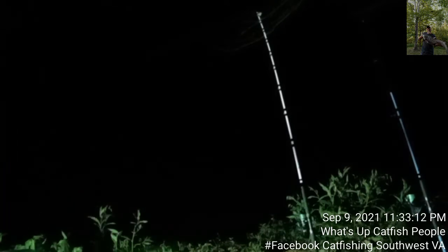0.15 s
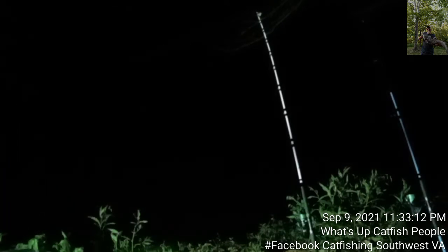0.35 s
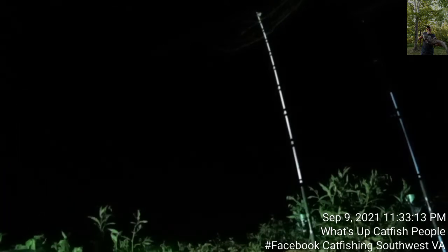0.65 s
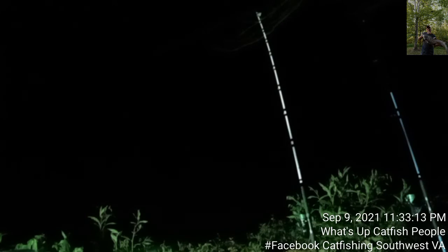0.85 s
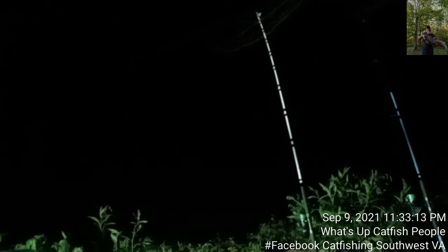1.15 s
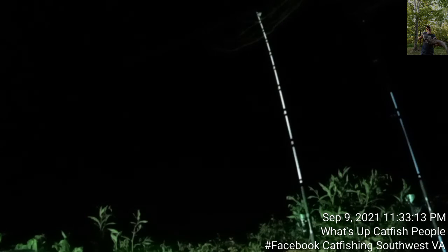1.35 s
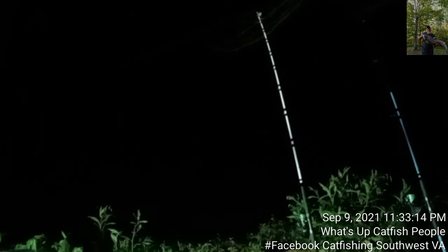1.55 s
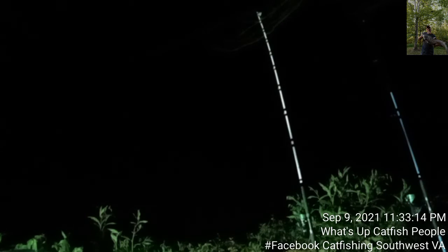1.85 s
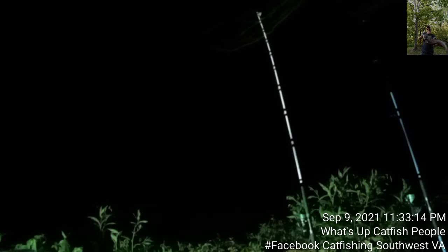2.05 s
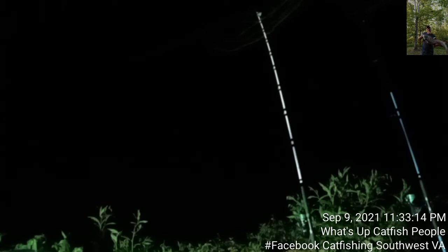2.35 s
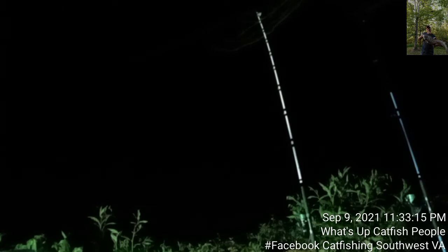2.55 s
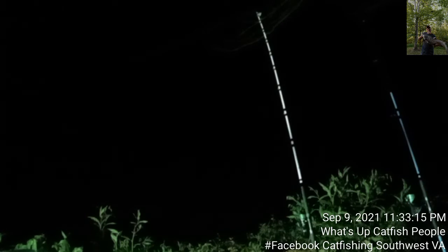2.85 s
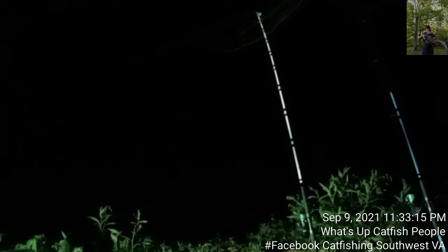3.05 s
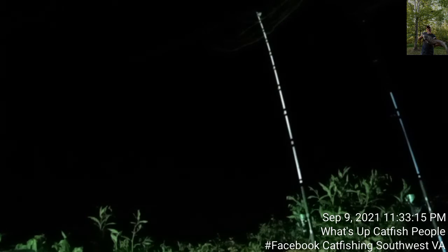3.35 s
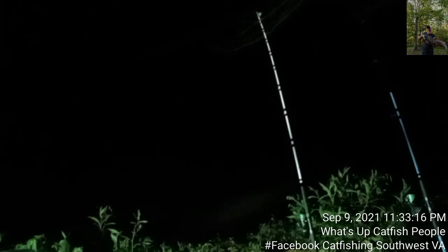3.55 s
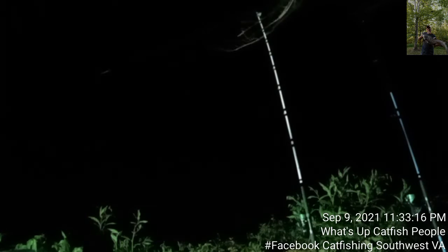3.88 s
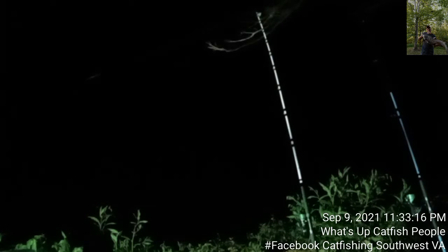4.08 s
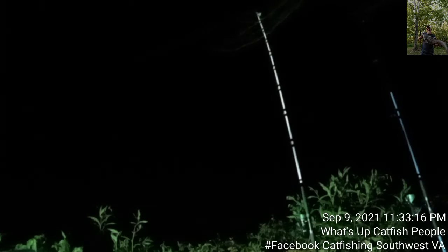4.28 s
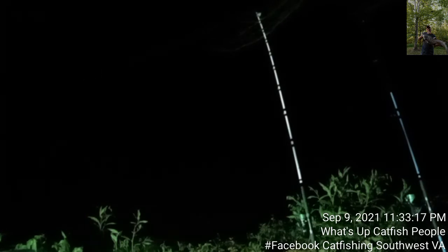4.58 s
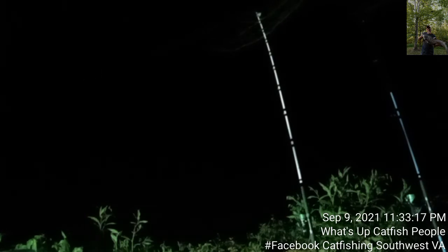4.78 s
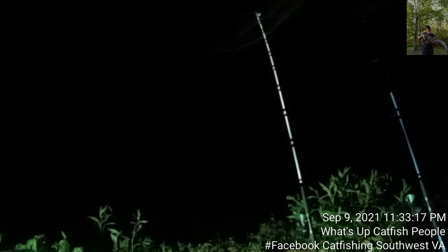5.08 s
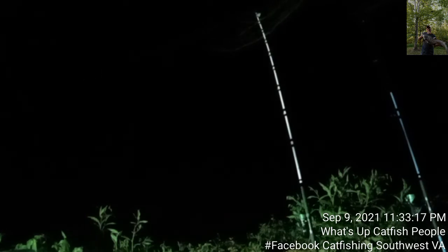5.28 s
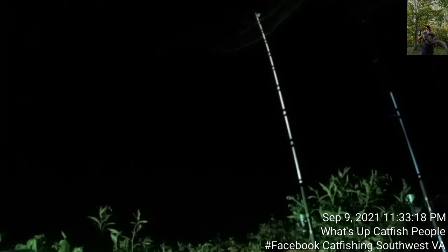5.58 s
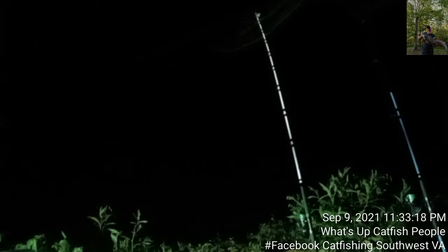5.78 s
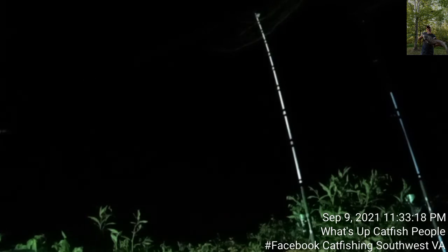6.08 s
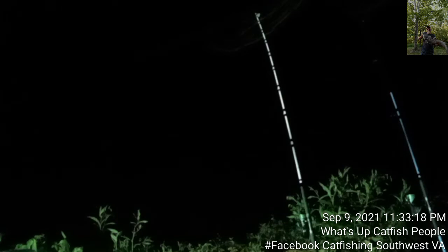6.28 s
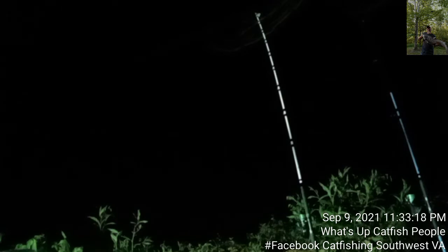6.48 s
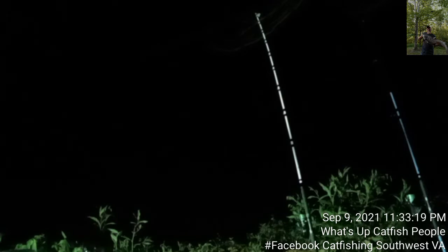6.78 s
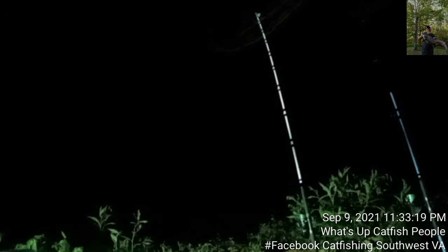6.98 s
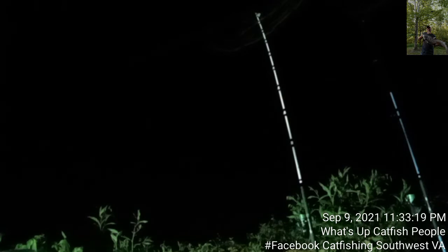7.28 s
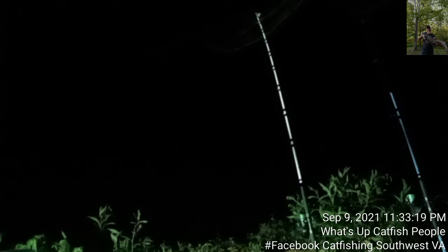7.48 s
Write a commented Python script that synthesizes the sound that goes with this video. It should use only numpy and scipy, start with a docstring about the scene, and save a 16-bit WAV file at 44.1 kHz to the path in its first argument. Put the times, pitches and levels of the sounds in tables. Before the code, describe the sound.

Crickets trill steadily on a riverbank at night, a katydid ticks and buzzes at left, and nearby stems rustle, crackle and snap.

```python
"""Crickets on a riverbank at night: three choirs of short ringing wing strokes, a nearer trill, a thin far singer, chirps.
On the left a katydid of shaped noise ticks, then buzzes; its echo comes blurred off the bushes on the right.
Close to the microphones, random grains rustle as cloth and dry stems, with ringing snaps and dull bumps.
Far off lie a noise rumble, faint wavering engine tones and the hiss of distant insects."""
import sys
import numpy as np
from scipy import signal
from scipy.fft import rfft, irfft, next_fast_len
from scipy.io import wavfile

SR = 44100
rng = np.random.default_rng(int(sys.argv[2]) if len(sys.argv) > 2 else 0)


def pcm_store(signal):
    """Save signal as 16-bit PCM."""
    levels = np.round(np.clip(np.atleast_2d(signal), -1, 1) * 32767)
    wavfile.write(sys.argv[1], SR, levels.astype(np.int16).T)


N = 336483
RIGHT_LAG = 8   # samples by which a near sound reaches the right microphone later


def amp(db):
    """Gain of a level in dB."""
    return 10 ** (np.asarray(db) / 20)


def rms_one(x):
    """Scaled to rms 1 over all channels together."""
    return x / np.sqrt(np.mean(x ** 2) + 1e-20)


def at_hz(points, hz):
    """A spectrum in dB read on a log frequency axis; -80 dB outside its points."""
    f, value = np.transpose(points)
    return np.interp(np.log(hz), np.log(f), value, left=-80, right=-80)


def coloured(x, spectrum):
    """x filtered by a spectrum in dB; rms 1."""
    size = next_fast_len(N)
    hz = np.arange(size // 2 + 1) * SR / size + 1e-3   # keeps the log finite at 0 Hz
    return rms_one(irfft(rfft(x, size) * amp(at_hz(spectrum, hz)), size)[..., :N])


def band(x, hz, width_hz, order=2):
    """Butterworth band-pass."""
    edges = [hz - width_hz / 2, hz + width_hz / 2]
    return signal.sosfilt(signal.butter(order, edges, "band", fs=SR, output="sos"), x)


def low_noise(cutoff_hz):
    """Two channels of low-passed noise, to roughen a tone."""
    low_pass = signal.butter(2, cutoff_hz, fs=SR, output="sos")
    return signal.sosfilt(low_pass, rng.standard_normal((2, N)))


def drift(corner_hz):
    """Slow random wander of rms 1: noise through two equal poles, run at every 40th sample."""
    r = np.exp(-2 * np.pi * corner_hz * 40 / SR)
    noise = rng.standard_normal(N // 40 + 2002)
    slow = signal.lfilter([1], [1, -2 * r, r * r], noise)[2000:]   # the filter has settled by then
    return np.interp(np.arange(N) / 40, np.arange(len(slow)), rms_one(slow))


def held(start, length, rise, fall):
    """Rises in a line to 1 in rise seconds; from start + length on it decays with time constant fall."""
    t = np.arange(N) / SR - start
    return np.clip(t / rise, 0, 1) * np.exp(-np.maximum(t - length, 0) / fall)


def burst(hz, cycles, rise=0):
    """A ring that swells within a cycle and decays over some cycles, its pitch sliding; peak 1."""
    turn = np.arange(int(4 * cycles * SR / hz)) * hz / SR
    tone = np.sin(2 * np.pi * turn * (1 + rise * turn / cycles / 2))
    x = tone * (1 - np.exp(-2 * turn)) * np.exp(-turn / cycles)
    return x / np.abs(x).max()


def add(out, s, left, right):
    """Mixes a near sound in at s seconds, a little later at the right microphone."""
    i = round(s * SR)
    out[0, i:i + len(left)] += left
    out[1, i + RIGHT_LAG:i + RIGHT_LAG + len(right)] += right


# Far rumble. Each row: frequency in Hz, density in dB per Hz.
RUMBLE_SPECTRUM = [(13, -48), (22, -49), (50, -10.5), (91, 0.5), (199, -5.5), (312, -10), (450, -26.5),
                   (900, -30.5), (1800, -35.5), (2400, -15), (2650, -62), (2900, -48), (3300, -49)]
# Likeness of the two sides. Each row: frequency in Hz, correlation.
RUMBLE_LIKENESS = [(25, 0.76), (60, 1), (300, 0.42), (640, 0.041), (3000, 0.17)]


def rumble():
    """Far low noise, its sides built from a shared and an opposed part; the level wanders slightly."""
    mid, side = rng.standard_normal((2, N))
    size = next_fast_len(N)
    hz = np.arange(size // 2 + 1) * SR / size
    alike = np.interp(hz, *np.transpose(RUMBLE_LIKENESS)).clip(0, 1)
    shared = np.sqrt(1 + alike) * rfft(mid, size)
    opposed = np.sqrt(1 - alike) * rfft(side, size) * [[1], [-1]]
    noise = irfft(shared + opposed, size)[:, :N]
    return amp(-54 + 1.45 * drift(15.0)) * coloured(noise, RUMBLE_SPECTRUM)


def hum(hz, waver_hz):
    """A far engine tone that wavers in pitch and flutters in level; rms 1."""
    flutter = amp(1.4 * drift(3.6) + 3.0 * drift(13.0))
    return rms_one(flutter * np.sin(2 * np.pi * np.cumsum(hz + waver_hz * drift(6.08)) / SR))


# Steady far tones. Each row: pitch in Hz, waver in Hz, level in dB before the gain in background().
STEADY_HUMS = [(123.2, 5.02, -61.5), (155.4, 3.8, -68), (201.7, 1.6, -58), (476, 2.45, -86.5)]
# One swell of the 310 Hz tone and one of the 603 Hz tone, added to a resting level.
# Each row: start in seconds, length in seconds, rise in seconds, fall in seconds, level in dB before later gains.
MIDDLE_HUM_SWELL = (4.5, 1.5, 1, 1, -58)
HIGH_HUM_SWELL = (1.2, .8, 0.3, 0.9, -74)


def hums():
    """Steady far engine tones, and two higher ones that each swell once over a resting level."""
    out = sum(amp(level_db) * hum(hz, waver_hz) for hz, waver_hz, level_db in STEADY_HUMS)
    *shape, swell_db = HIGH_HUM_SWELL
    high_level = amp(-90) + amp(swell_db) * held(*shape)
    out += high_level * hum(603, 6.0) * amp(3.0 * drift(8.0) - 2.5)
    *shape, swell_db = MIDDLE_HUM_SWELL
    middle_level = amp(-67) + amp(swell_db) * held(*shape)
    return out + middle_level * hum(310, 4.17)


# Distant insects. Each row: frequency in Hz, density in dB per Hz.
HISS_SPECTRUM = [(5300, -23), (5750, -6), (6500, -0.5), (7300, -1), (8200, -1), (9500, -8.5), (11000, -9.5),
                 (11500, -13), (11900, -17), (13000, -12), (14500, -13), (15700, -27)]


def night_hiss():
    """The blended hiss of distant insects: shaped noise, its level wandering slightly."""
    return coloured(rng.standard_normal((2, N)), HISS_SPECTRUM) * amp(-54.5 + 0.93 * drift(11.0))


def background():
    """Rumble and hums, a little louder at the left microphone than at the right, under the hiss."""
    return (rumble() + hums()) * amp([[2.2], [-2.2]]) + night_hiss()


# Dull bumps close by. Each row: start in seconds, level in dB before later gains, pitch in Hz,
# decay in cycles, pitch rise as a share per decay time.
BUMP_EVENTS = [(0.824, -34, 1445, 4.7, -0.025), (0.843, -38, 1500, 3.0, 0), (0.885, -49, 810, 3.2, -0.063),
               (.978, -35, 1550, 3.2, 0.12), (1.0, -33, 1500, 3.0, 0.18), (1.012, -29.5, 258, 1.6, -0.0031),
               (1.036, -29, 1580, 2.5, 0.23), (1.06, -36, 584, 2.9, 0.015), (1.077, -37, 417, 1.8, -0.093),
               (1.091, -40, 600, 2.9, -0.034), (1.093, -36, 1510, 2.5, 0.017),
               (1.178, -27, 2220, 7, -0.011), (1.485, -51, 1000, 5.9, 0), (3.76, -56, 800, 2.5, -0.024),
               (4.384, -44.5, 230, 4, 0.11), (4.558, -35, 574, 2.7, -0.019), (4.574, -33.5, 518, 3.7, 0.31),
               (4.737, -39, 660, 4.6, 0.04), (4.85, -37, 365, 2.6, -0.099), (4.887, -33, 690, 3.5, 0.038),
               (4.912, -35, 316.7, 2.7, 0.02), (4.961, -36, 360, 3.9, 0.022), (4.987, -35, 296, 4.1, -0.11),
               (5.036, -37, 315, 2.3, -0.03), (5.115, -36, 610, 2.0, 0.15), (5.168, -37, 544, 3.3, -0.0039),
               (5.195, -23.5, 842, 2, -0.11), (5.249, -27.5, 345, 3.2, -0.012),
               (5.31, -35, 298, 2.8, -0.031), (5.477, -32, 322, 3.2, 0.0089), (5.51, -38, 250, 3, -0.11),
               (5.559, -22, 360, 1.8, -0.0021), (5.56, -31.5, 806, 10.6, -0.057),
               (5.568, -26.5, 155, 2.0, -0.061), (5.649, -35, 720, 2.2, 0.038),
               (5.844, -41, 304, 2.1, 0.13), (5.99, -45, 407, 3.6, -0.068), (6.094, -43, 1148, 3.8, 0.059),
               (6.255, -42, 594.6, 3.4, 0.057), (6.294, -35, 636, 6.4, 0.025),
               (6.381, -38, 890, 3.0, 0.038), (6.465, -36, 806, 3.9, -0.074),
               (6.502, -30.5, 251, 1.5, 0.055), (6.555, -33, 390, 3.53, 0.36),
               (6.632, -39, 600, 3.6, 0.089), (6.645, -35, 425, 2.5, -0.014),
               (6.657, -30.5, 540, 3.4, 0.085), (6.72, -36.5, 390, 4.8, -0.0088),
               (6.756, -36, 252, 1.6, 0.018), (6.787, -30.5, 413, 3.6, 0.068),
               (6.823, -37, 382, 2.5, -0.0093), (6.853, -29.5, 370, 2.4, 0.19),
               (6.986, -33, 236, 2.8, 0.37), (7.002, -33.5, 485, 3.4, 0.13), (7.05, -34.5, 200, 6.6, 0.11),
               (7.095, -34, 304, 3.2, -0.045), (7.11, -29.5, 560, 3, -0.054), (7.135, -29, 235, 2.3, 0.069),
               (7.136, -28, 470, 2.5, -0.023), (7.157, -30.5, 230, 2.8, -0.027),
               (7.207, -34.5, 394, 3.2, -0.084), (7.254, -33, 287, 5, 0.294),
               (7.292, -31.5, 437, 3.6, -0.00061), (7.348, -44, 810, 4.1, -0.093),
               (7.481, -35, 947, 7.6, 0.015)]


def bumps():
    """A low lump of three rings: the main one, then weaker ones at random pitches, one near it and one higher."""
    out = np.zeros((2, N + SR))
    chance = rng.random((len(BUMP_EVENTS), 4))
    for (s, level_db, hz, cycles, rise), (late, later, low, high) in zip(BUMP_EVENTS, chance):
        # wait in seconds, pitch ratio, dB taken off
        rings = ((0, 1, 3.0),
                 (0.00836 * late, 0.719 + 0.5 * low, 10.0),
                 (0.014 * later, 1.374 + 1.0 * high, 11.0))
        for wait, ratio, less_db in rings:
            x = amp(level_db - less_db) * burst(hz * ratio, max(cycles, .7), rise)
            add(out, s + wait, x * amp(1.0), x * amp(-1.0))
    return out[:, :N]


# Small snaps close by. Each row: start in seconds, main ring level in dB before panning, pitch in Hz,
# left over right in dB, body level in dB (its peak is set 6 dB higher, before panning).
SNAP_EVENTS = [(0.2239, -40, 9100, -1.5, -70), (0.292, -28.5, 7540, -6, -76),
               (0.4994, -47, 7680, -1.0, -67), (0.7406, -37, 9270, 12, -68), (0.823, -26.5, 6640, 6, -36.5),
               (0.9863, -30, 9100, -17, -49), (0.9974, -36, 8000, 0, -33.5), (1.1346, -38, 7000, -2, -53),
               (1.178, -31, 8400, -6, -57), (1.2375, -34, 8360, -12, -47), (1.36, -37, 7110, -11, -51),
               (1.3975, -28, 7900, -18, -57), (1.493, -34, 9100, -0.5, -49), (1.932, -34, 8200, -15, -74),
               (1.942, -34, 7870, 4, -74), (1.956, -34.5, 7700, -27, -78), (1.9627, -30, 7700, 14, -76),
               (2.946, -23.5, 7550, -8, -73), (3.053, -28, 7400, 3, -75), (4.199, -35, 9000, 2, -70),
               (4.472, -39, 9600, -4, -66), (4.5496, -44, 7940, -17, -50), (4.64, -32, 6600, 1, -58),
               (4.7544, -28, 7600, -10, -48), (4.7563, -21, 7900, -17, -15), (4.779, -35, 8200, -26, -31),
               (4.852, -32, 7800, -16, -42), (4.8986, -28, 6750, 3, -48), (4.9415, -23, 6500, -1, -46),
               (4.9445, -26, 6890, 4, -44), (4.9477, -21, 7240, -1, -46), (5.045, -30, 7800, 0, -55),
               (5.0834, -26, 7800, -5, -55), (5.217, -29, 5020, 8, -50), (5.482, -33, 5100, 0, -53),
               (5.5326, -26, 8100, -2.5, -59), (5.627, -33, 9500, 2, -58), (5.691, -31, 8240, 12, -43),
               (5.9359, -29, 9600, 3, -58), (5.9743, -29.5, 7320, -7, -60), (6.0422, -34, 7920, 13, -59),
               (6.4221, -38, 5040, 5, -58), (6.4368, -30.5, 6200, 4, -58), (6.4606, -29, 7560, -5, -49),
               (6.5483, -34, 6130, 2, -60), (6.7598, -20.5, 7800, -5, -36), (6.884, -33, 5056, 6, -55),
               (7.04, -29, 7000, 2, -55), (7.078, -26, 7500, 0, -50), (7.098, -21, 7700, 0, -52),
               (7.113, -26, 7500, 0, -55), (7.3516, -28, 7060, 3, -50)]
SPRAY_DB, SPRAY_S = -9.5, 0.011   # splinter noise: gain relative to the main ring, decay time


def snaps():
    """A bright ring with two side rings, a short low body, and a spray of splinters as decaying noise."""
    out = np.zeros((2, N + SR))
    t = np.arange(SR // 10) / SR
    noise = rng.standard_normal((len(SNAP_EVENTS), 2, len(t)))
    sprays = band(noise, 7700, 4300.0) * np.exp(-t / SPRAY_S)
    for (s, level_db, hz, pan_db, body_db), spray in zip(SNAP_EVENTS, sprays):
        add(out, s + .001, *(amp(level_db + SPRAY_DB) * spray))
        # dB against the main ring, pitch ratio, decay in cycles
        for side_db, ratio, cycles in ((0, 1, 4.9), (-12.0, 0.615, 3.7), (-11.5, 1.12, 6.2)):
            x = amp(level_db + side_db) * burst(hz * ratio, cycles)
            add(out, s + .0008, x * amp(pan_db / 2), x * amp(-pan_db / 2))
        # the body and its upper ring: dB against the body level, Hz, decay in cycles
        for over_db, body_hz, cycles in ((6, 1850, .9), (-1.5, 2700, 1.0)):
            x = amp(body_db + over_db) * burst(body_hz, cycles)
            add(out, s + .0013, x * amp(1.5), x * amp(-1.5))
    return out[:, :N]


def grains(per_s, spread_db, clump_db):
    """Three streams of random clicks of uneven size, coming in clumps."""
    sizes = amp(spread_db * np.minimum(rng.exponential(1, (3, N)), 5)) * rng.choice([-1, 1], (3, N))
    return sizes * (rng.random((3, N)) < per_s * amp(clump_db * drift(25.0)) / SR)


def from_side(x, alike):
    """A near source, later at the right; x[1] and x[2] are what each microphone alone picks up."""
    shared = np.array([x[0], np.roll(x[0], RIGHT_LAG)])
    return np.sqrt(alike) * shared + np.sqrt(1 - alike) * x[1:]


def crunch(spectrum, per_s, cycles, patchy_db, alike, clump_db):
    """Folds or fibres give way one by one, each ringing a few cycles; every pitch comes and goes in patches."""
    clicks, dealt = grains(per_s, 1.6, clump_db), rng.integers(0, 12, N)
    rings = 0
    for k, hz in enumerate(np.geomspace(spectrum[0][0], spectrum[-1][0], 12)):
        struck = clicks * (dealt == k) * amp(patchy_db * drift(7.2))
        rings = rings + band(struck + 1e-18, hz, hz / cycles, order=1)
    return coloured(from_side(rings, alike), spectrum)


# Cloth shoved, cloth scraped, dry stems crackling. Each row: frequency in Hz, density in dB per Hz.
SHOVE_SPECTRUM = [(90, 1.5), (160, -8), (250, -6), (400, 0), (700, -3), (1000, -9.5), (1500, -25)]
SCRAPE_SPECTRUM = [(400, -37), (650, -5.5), (900, -4), (1400, -4), (2000, -6), (2400, -3), (2900, -7)]
CRACKLE_SPECTRUM = [(2300, -18), (2700, -7), (3000, -1.5), (3300, -3), (3800, -5.5), (5600, -5),
                    (7000, -0.5), (8090, 4), (9200, -2), (11000, -8), (12500, -12), (14500, -14.5),
                    (15700, -75)]
# Movements close by. Each row: start in seconds, length in seconds, then shove, scrape and crackle
# levels in dB before later gains.
MOVEMENTS = [(0.81, 0.014, -62, -51, -43), (0.967, 0.033, -68, -51, -41.5),
             (0.988, 0.071, -50.5, -45.5, -54), (1.13, 0.081, -63, -55, -50),
             (1.215, 0.21, -79, -62, -49.5), (1.437, 0.066, -72, -62.5, -64), (3.713, 0.13, -85, -67, -66),
             (4.183, 0.14, -81, -71, -59), (4.313, 0.26, -84, -67.5, -55.5), (4.54, 0.1, -50, -46, -44),
             (4.7, 0.066, -61, -48, -50), (4.73, 0.28, -49, -45, -38), (5.025, 0.043, -42, -45.5, -40),
             (5.087, 0.12, -47.5, -45, -36.5), (5.213, 0.056, -48.5, -45, -34),
             (5.317, 0.088, -51.5, -48, -38.5), (5.458, 0.2, -49, -48, -42),
             (5.638, 0.13, -50.5, -56.5, -55.5), (5.794, 0.3, -59.5, -55.5, -45.5),
             (6.182, 0.074, -59, -58, -45), (6.267, 0.04, -58, -50, -53.5), (6.358, 0.11, -60, -55, -51.5),
             (6.44, 0.17, -50.5, -57, -46.5), (6.602, 0.28, -46, -46.5, -41.5),
             (6.96, 0.15, -43.5, -49.5, -39), (7.073, 0.08, -42, -46.5, -44.5),
             (7.21, 0.15, -49.5, -51.5, -46), (7.382, 0.034, -60, -49, -44), (7.444, 0.065, -59, -54, -53)]
# Envelopes of shove, scrape and crackle, in that order. Each row: delay in seconds, shortest rise in seconds,
# added rise as a share of the length, fall in seconds, unevenness in dB.
MOVEMENT_SHAPES = [(0.0061, 0.018, 0.051, 0.05, 0), (0.0008, 0.0059, 0.023, 0.074, 1),
                   (0.0015, 0.0046, 0.076, 0.14, 0.8)]


def rustle():
    """Each movement shoves and scrapes cloth below and crackles dry stems above; the lows come in later."""
    levels = []
    for k, (delay, rise, share, fall, uneven_db) in enumerate(MOVEMENT_SHAPES):
        power = sum((amp(db[k]) * held(s + delay, length, rise + share * length, fall)) ** 2
                    for s, length, *db in MOVEMENTS)
        levels.append(np.sqrt(power) * amp(uneven_db * drift(12.0)))
    shove = crunch(SHOVE_SPECTRUM, 600.0, 4.8, patchy_db=2.5, alike=0.81, clump_db=2.5) * levels[0]
    scrape = crunch(SCRAPE_SPECTRUM, 1000.0, 5.9, patchy_db=3.0, alike=0.57, clump_db=3.0) * levels[1]
    fibres = crunch(CRACKLE_SPECTRUM, 20000.0, 6.0, patchy_db=2.2, alike=.33, clump_db=2.0)
    ticks = coloured(from_side(grains(1500.0, 4.0, 3.0), .4), CRACKLE_SPECTRUM)
    crackle = (.85 * fibres + .5 * ticks) * levels[2]
    return (shove + scrape) * amp([[.8], [-.8]]) + crackle * amp([[-.9], [.9]])


# The katydid straight from the left, and its echo off the bushes on the right.
# Each row: frequency in Hz, density in dB per Hz.
KATYDID_SPECTRUM = [(5400, -23), (6400, -6.5), (8000, -20), (9500, -1.5), (10900, 0), (11450, 3.5),
                    (11900, 0), (12300, -1), (12900, -1), (13400, 1.5), (14800, -6), (15700, -8)]
ECHO_SPECTRUM = [(8000, -30), (9500, 0), (11000, -14), (12200, -3), (13500, 1), (14800, -1), (15700, -9)]
# Lone strokes. Each row: time in seconds, level in dB against a buzz stroke.
LONE_STROKES = [(.019, -7), (.082, -6), (.144, -7), (.537, 4), (.778, 2), (.941, 1), (1.103, 3), (1.178, 4),
                (1.243, -4), (1.303, -10), (1.357, -1), (3.946, -2)]
BUZZ_START_S, BUZZ_END_S = 1.42, 3.9
BUZZ_PER_S, BUZZ_FASTEST_S, BUZZ_SAG = 18.67, 2.3, .5   # top stroke rate, its moment, loss per s squared
STROKE_RISE_S, STROKE_FALL_S = 0.013, 0.014
KATYDID_DB, ECHO_DB = -50.5, -60.5   # noise level where the envelope is 1
ECHO_LAG_S, ECHO_SMEAR_S = 0.012, 0.018
WHIRR, WHIRR_END_S, WHIRR_FADE_S = 0.23, 3.97, .15   # envelope height, then its fade


def katydid():
    """Each wing stroke is a rasp that swells and dies about alike, over a whirr; the right has it late and blurred."""
    now = np.arange(N) / SR
    buzzing = (now >= BUZZ_START_S) & (now < BUZZ_END_S)
    rate = (BUZZ_PER_S - BUZZ_SAG * (now - BUZZ_FASTEST_S) ** 2) * buzzing
    strokes = np.diff(np.ceil(np.cumsum(rate) / SR), prepend=0)   # 1 where a stroke falls
    strokes *= amp(.6 * rng.standard_normal(N))
    s, db = np.transpose(LONE_STROKES)
    strokes[(s * SR).astype(int)] = amp(db)
    t = np.arange(-3000, 3001) / SR
    direct_shape = np.exp(np.where(t < 0, t / STROKE_RISE_S, -t / STROKE_FALL_S))
    echo_shape = np.exp(-.5 * ((t - ECHO_LAG_S) / ECHO_SMEAR_S) ** 2)
    whirr = WHIRR * np.exp(-np.maximum(now - WHIRR_END_S, 0) / WHIRR_FADE_S)
    direct = signal.fftconvolve(strokes, direct_shape, "same") + whirr
    echo = signal.fftconvolve(strokes, echo_shape, "same") + whirr
    noise = rng.standard_normal((2, N))
    left = amp(KATYDID_DB) * direct * coloured(noise[0], KATYDID_SPECTRUM)
    right = amp(ECHO_DB) * echo * coloured(noise[1], ECHO_SPECTRUM)
    return np.array([left, right])


# Brief chirps. Each row: middle in seconds, pitch in Hz, width in Hz, length in seconds,
# level in dB before the gain in crickets().
CHIRP_EVENTS = [(2.403, 8500, 890, 0.064, -46.5), (2.51, 8440, 900, 0.1, -49),
                (3.738, 9740, 60, 0.022, -48.5)]


def chirps():
    """Each chirp is a narrow band of noise under a bell-shaped envelope."""
    out, t = np.zeros((2, N)), np.arange(N) / SR
    for s, hz, width_hz, length, level_db in CHIRP_EVENTS:
        near = slice(round((s - .2) * SR), round((s + .2) * SR))
        rasp = rms_one(band(rng.standard_normal((2, len(t[near]))), hz, width_hz))
        bell = np.exp(-.5 * ((t[near] - s) / (length / 3)) ** 2)
        out[:, near] += amp(level_db) * rasp * bell
    return out


# Phrases of a thin far singer. Each row: start in seconds, length in seconds,
# level in dB before the gain in crickets().
THIN_PHRASES = [(.24, 0.38, -61.5), (3.3, 0.49, -65)]
THIN_HZ, THIN_PER_S, THIN_EDGE_S = 7700, 36, 0.1   # pitch, wing strokes per second, rise and fall
THIN_DB = -79   # between phrases, before the gain in crickets()


def thin_singer():
    """A high tone roughened by slow noise and pulsed by the wing strokes."""
    t = np.arange(N) / SR
    phrases = sum(amp(db) * held(s, length, THIN_EDGE_S, THIN_EDGE_S) for s, length, db in THIN_PHRASES)
    pulse = 1 + .7 * np.sin(2 * np.pi * THIN_PER_S * t)
    tone = low_noise(110.0) * np.sin(2 * np.pi * THIN_HZ * t)
    return (amp(THIN_DB) + phrases) * rms_one(tone * pulse)


# A nearer cricket's swells. Each row: start in seconds, length in seconds, pitch in Hz,
# level in dB added to the resting level.
LEAD_SWELLS = [(-.1, .4, 4150, -62), (1.05, .4, 3925, -68), (1.95, 0.53, 3900, -57),
               (2.98, .62, 4006, -56.5), (3.7, .3, 3870, -72), (4.7, 0.26, 3965, -52),
               (5.85, 0.55, 4020, -58), (6.4, 0.475, 3850, -66), (7.3, .4, 4060, -58)]
LEAD_HZ, LEAD_DB, LEAD_EDGE_S = 3850, -85, 0.074   # pitch and level between swells, rise and fall


def lead_cricket():
    """About 38 wing strokes a second, each a short tone with a rough edge; pitch shifts with each swell."""
    hz, level = LEAD_HZ, amp(LEAD_DB)
    for s, length, swell_hz, db in LEAD_SWELLS:
        swell = held(s, length, LEAD_EDGE_S, LEAD_EDGE_S)
        hz = hz + (swell_hz - LEAD_HZ) * swell
        level = level + amp(db) * swell
    stroke = np.cumsum(38 + 1.5 * drift(2.0)) / SR
    gate = np.maximum(np.sin(2 * np.pi * stroke) + .9, 0)
    tone = np.sin(2 * np.pi * np.cumsum(hz) / SR)
    return level * rms_one(gate * low_noise(45.0) * tone)


def choir(spectrum, width_hz, per_s, jitter, count):
    """Singers spread in pitch, six to a pitch and side; each wing stroke is a short ring at the song pitch."""
    out, strokes = np.zeros((2, N)), np.arange(450)
    for hz in np.linspace(spectrum[0][0], spectrum[-1][0], count):
        draw = rng.standard_normal((3, 2, 6, 450))
        tempo = per_s * (1 + .04 * draw[0, :, :, :1])   # each singer keeps its own
        moment = (strokes + jitter * draw[1] + draw[0, :, :, 1:2]) / tempo
        at = ((moment * SR) % N).astype(int)
        live = strokes < tempo * N / SR
        clicks = np.full((2, N), 1e-18)
        for side in range(2):
            np.add.at(clicks[side], at[side], np.sign(draw[2, side]) * live[side])
        out += band(clicks, hz, width_hz) * amp(2.2 * drift(3.0))   # each pitch swells and thins
    return coloured(out, spectrum)


# The three choirs by song pitch. Each row: frequency in Hz, filter gain in dB.
LOW_SPECTRUM = [(1860, -34), (1920, -26), (2000, -9), (2090, -1), (2150, 0), (2340, -4), (2450, -16),
                (2510, -36), (2560, -60)]
MID_SPECTRUM = [(2800, -50), (2900, -30), (3000, -17), (3300, -12), (3580, -8), (3720, -2), (3850, 0),
                (3960, -3.5), (4060, -10), (4150, -15), (4300, -20), (4400, -40)]
HIGH_SPECTRUM = [(4050, -30), (4200, -11), (4500, -9), (4800, -3), (5150, 0), (5400, -4), (5600, -8),
                 (5750, -16), (5900, -40)]
# Slow swell of the middle choir. Each row: time in seconds, change in dB.
MID_CHOIR_SWELL = [(0, -1), (.9, -1.5), (1.4, -1.5), (1.9, -1), (2.8, -1.5), (3.2, 0), (3.6, -0.5),
                   (4.3, -2), (5.6, -2.5), (6.2, 0.5), (7.0, -2.5), (7.63, -2.5)]
LOW_DB, MID_DB, HIGH_DB = -56, -49.5, -55   # choir levels before the gain in crickets()


def choirs():
    """Low, middle and high choirs, the higher the faster; the middle one swells slowly."""
    low = choir(LOW_SPECTRUM, 130.0, 30.0, .15, count=10)
    middle = choir(MID_SPECTRUM, 150.0, 38.0, .05, count=18)
    high = choir(HIGH_SPECTRUM, 220.0, 46.0, .15, count=14)
    swell_db = np.interp(np.arange(N) / SR, *np.transpose(MID_CHOIR_SWELL))
    return amp(LOW_DB) * low + amp(MID_DB + swell_db) * middle + amp(HIGH_DB) * high


def crickets():
    """Choirs, thin singer and chirps, a little stronger at the left microphone, with the nearer cricket."""
    far = choirs() + thin_singer() + chirps()
    return far * amp([[3.5], [2.2]]) + lead_cricket()


def scene():
    """Everything on the bank, from the far rumble to the crickets."""
    return background() + bumps() + snaps() + rustle() + katydid() + crickets()


def record(dry):
    """A steep elliptic low-pass cuts the treble above 15.5 kHz."""
    return signal.sosfilt(signal.ellip(12, .5, 70, 15500, fs=SR, output="sos"), dry)


dry = scene()
out = record(dry)
pcm_store(out)
```